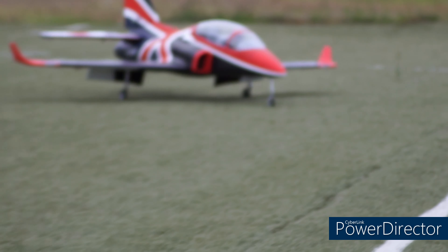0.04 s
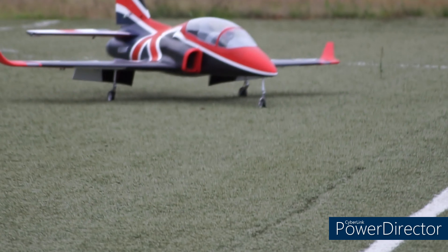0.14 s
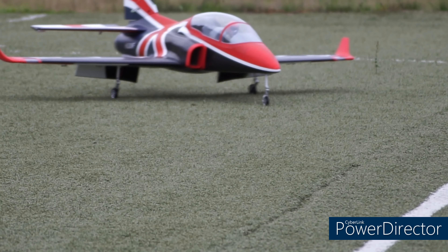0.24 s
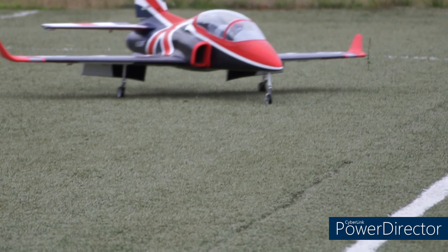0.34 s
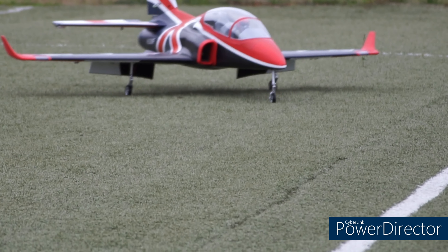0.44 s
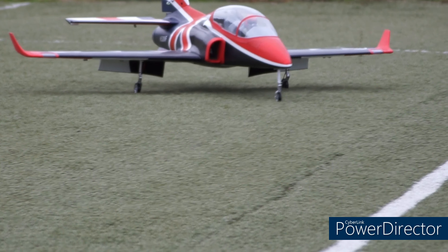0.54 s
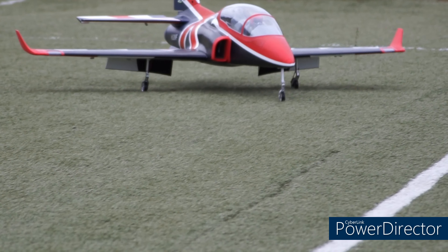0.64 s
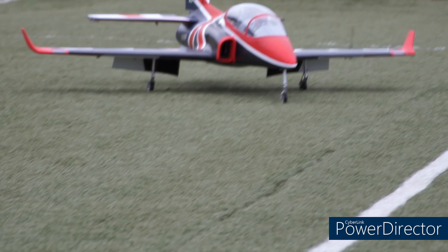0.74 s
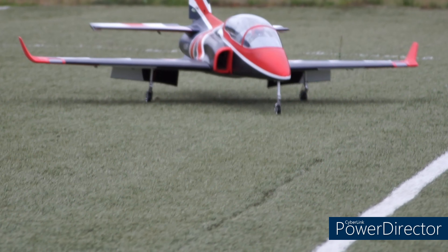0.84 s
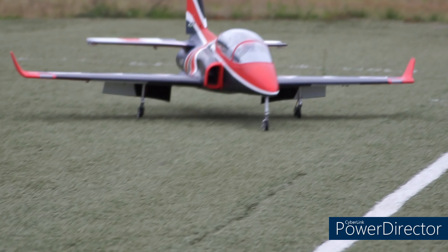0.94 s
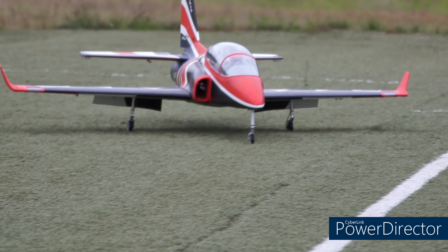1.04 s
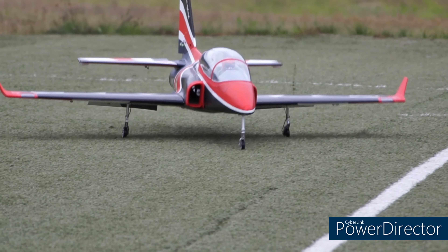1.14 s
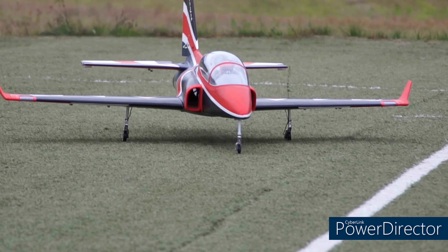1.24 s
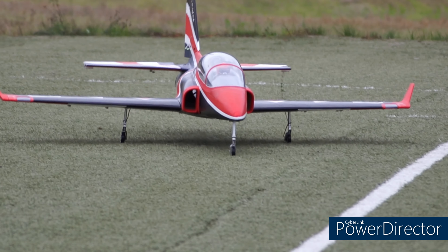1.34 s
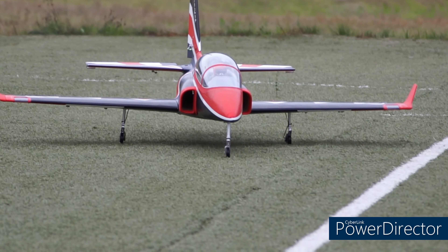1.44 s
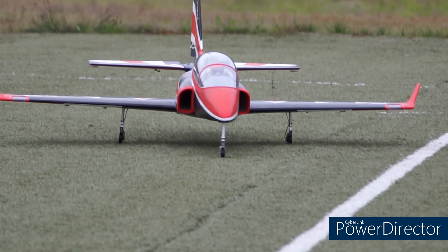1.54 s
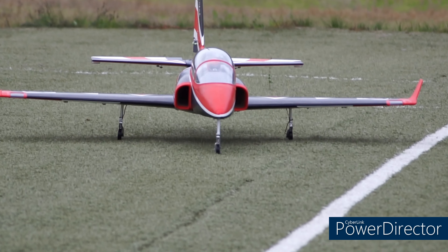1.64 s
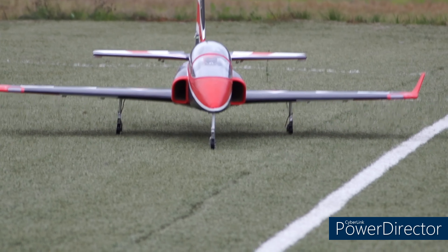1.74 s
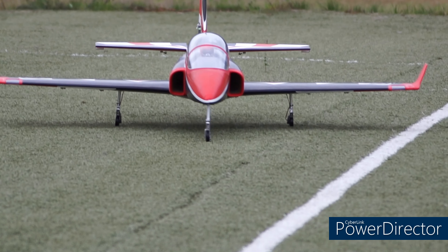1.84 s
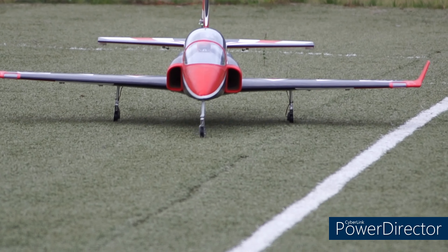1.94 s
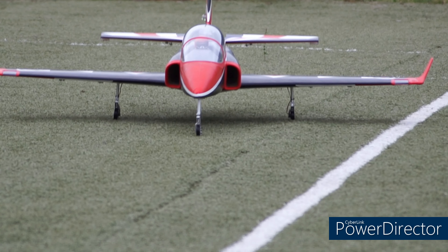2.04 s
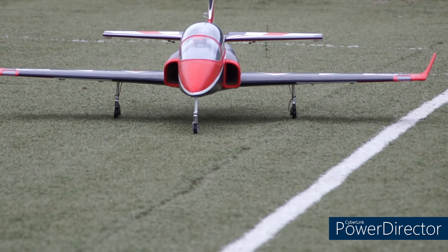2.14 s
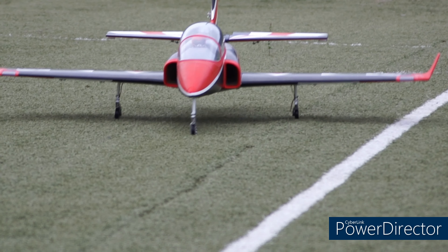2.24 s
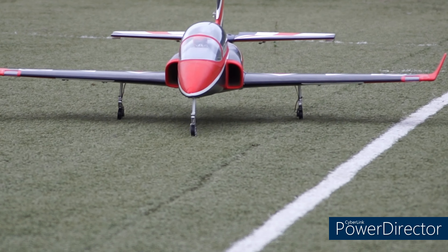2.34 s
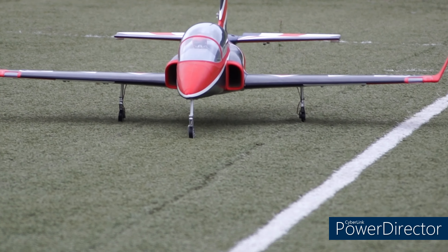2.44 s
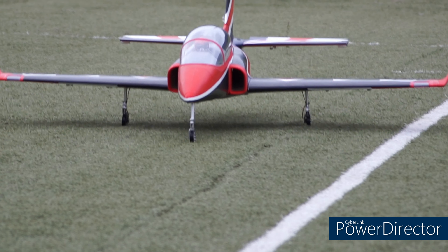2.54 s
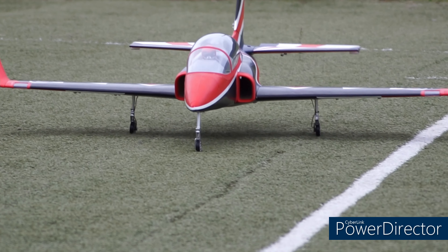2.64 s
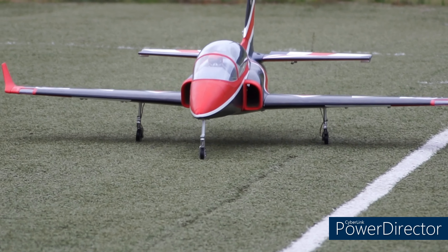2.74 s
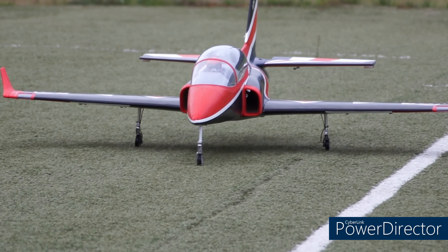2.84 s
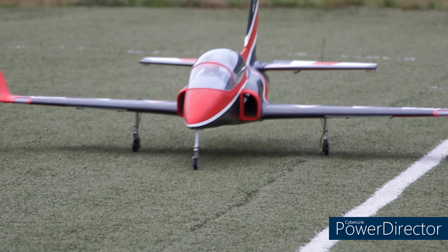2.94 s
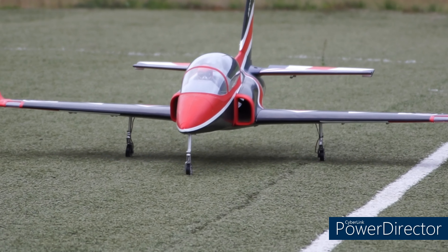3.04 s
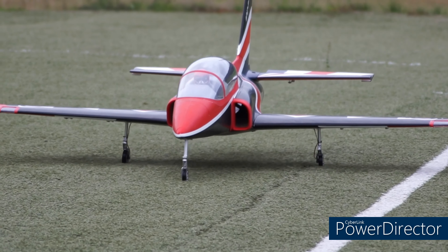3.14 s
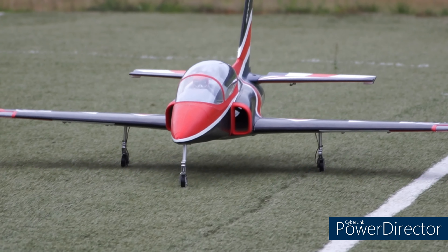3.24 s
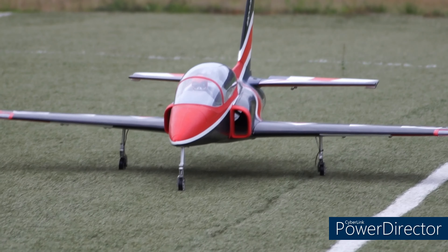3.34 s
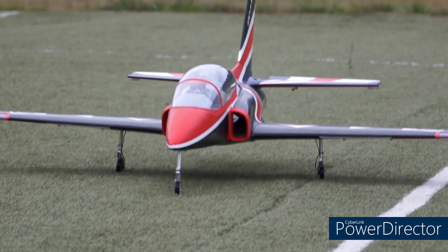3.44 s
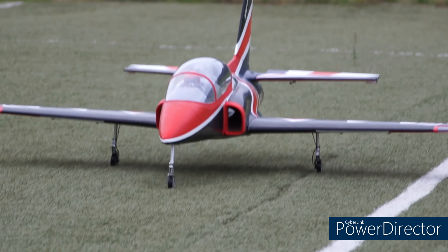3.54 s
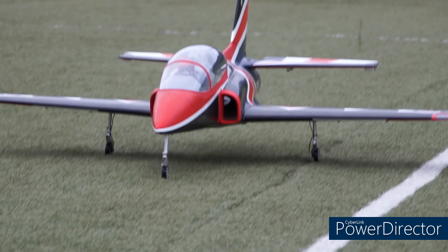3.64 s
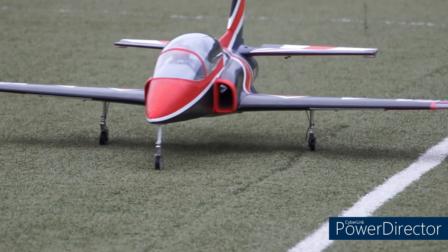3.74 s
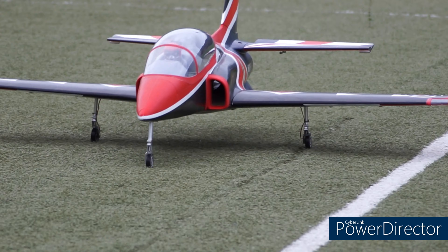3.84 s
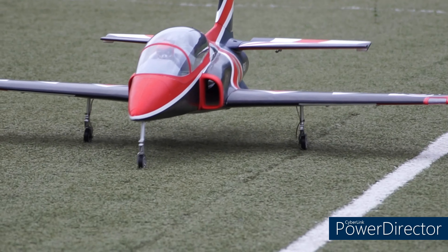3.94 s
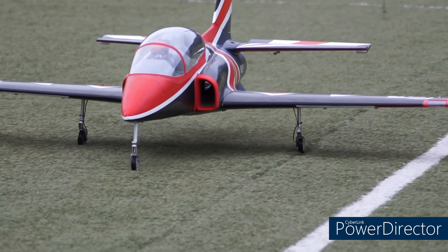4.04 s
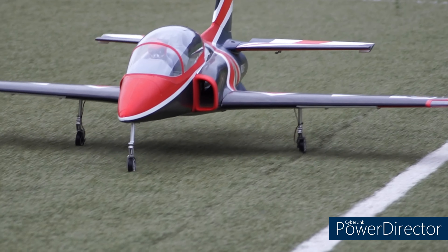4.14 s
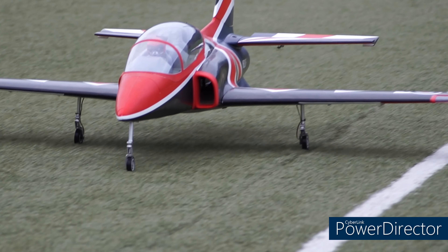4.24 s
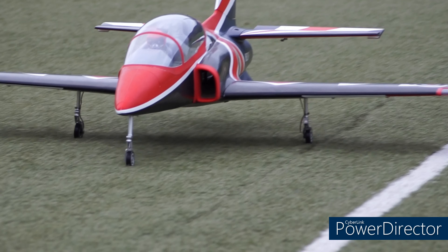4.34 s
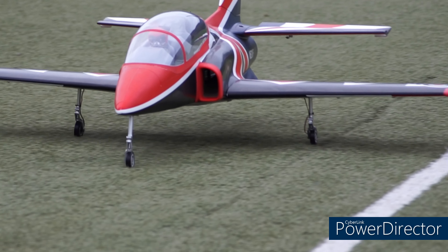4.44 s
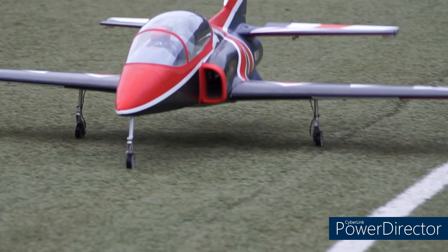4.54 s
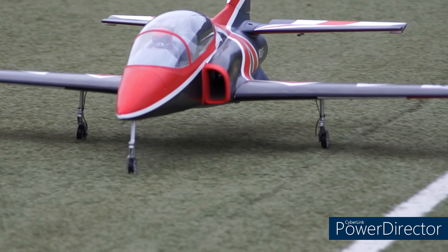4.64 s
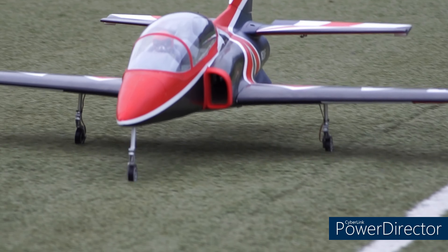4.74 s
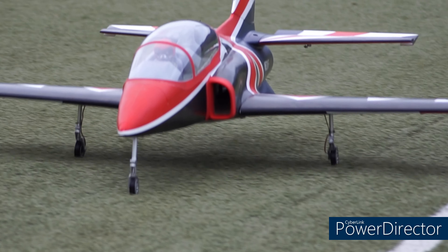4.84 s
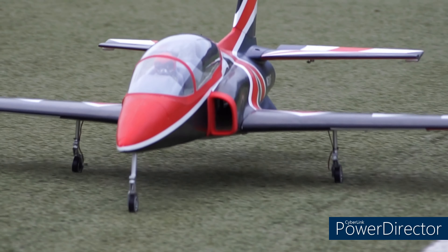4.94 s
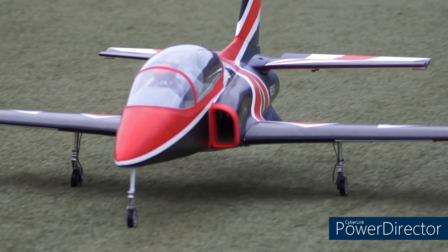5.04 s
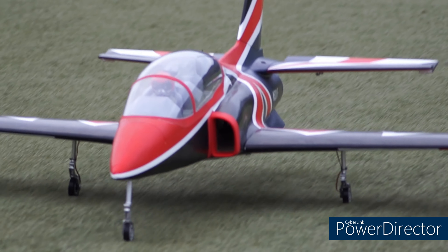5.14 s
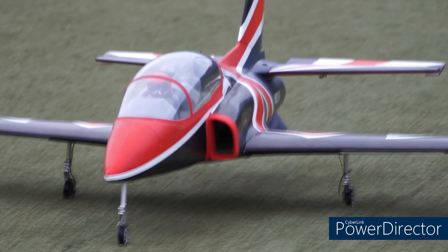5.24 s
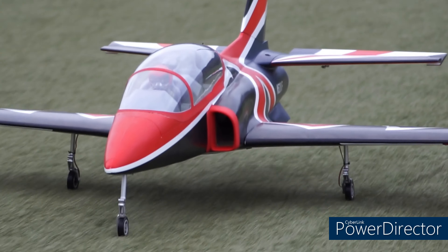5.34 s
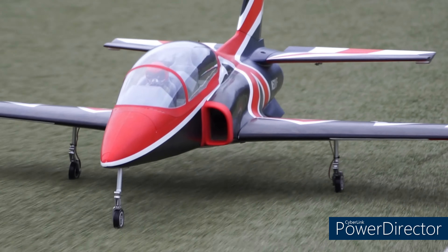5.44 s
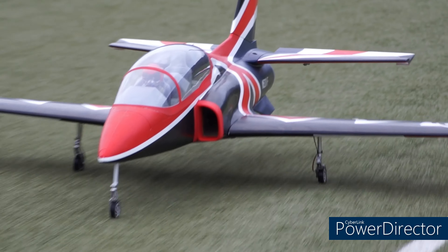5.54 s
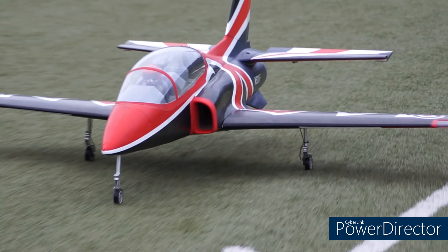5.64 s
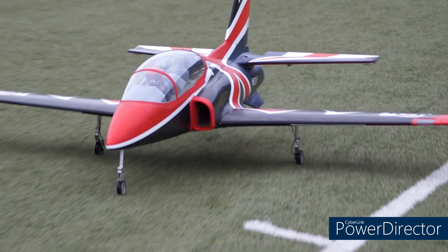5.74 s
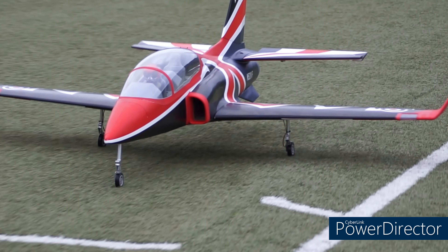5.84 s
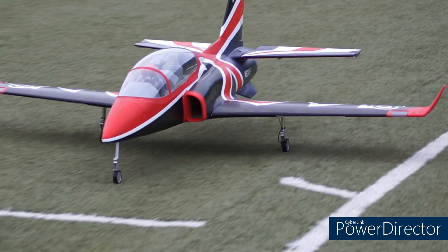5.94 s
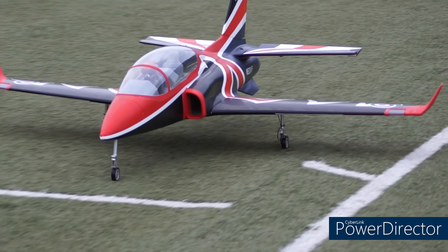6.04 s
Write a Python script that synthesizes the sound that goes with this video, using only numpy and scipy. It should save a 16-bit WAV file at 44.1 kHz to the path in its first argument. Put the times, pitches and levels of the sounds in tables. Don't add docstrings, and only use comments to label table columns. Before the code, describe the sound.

A small ducted-fan jet whines steadily over a rush of air while sharp plastic clicks snap in bursts right beside the microphone.

```python
import sys
import numpy as np
from scipy import signal
from scipy.fft import rfft, irfft, next_fast_len
from scipy.io import wavfile
from scipy.ndimage import uniform_filter1d

SR = 44100
rng = np.random.default_rng(int(sys.argv[2]) if len(sys.argv) > 2 else 0)


def file_out(sig):
    cols = np.atleast_2d(sig).T
    lim = np.clip(cols, -1, 1)
    pcm = np.round(lim * 32767).astype(np.int16)
    wavfile.write(sys.argv[1], SR, pcm)


def voltage_ratio(decibels):
    exponent = np.asarray(decibels, float) / 20
    return 10 ** exponent


N = 268569

# time_s, blade_pass_hz
THROTTLE = [(0, 2410), (.31, 2409), (.72, 2134), (1.4, 2156), (2.19, 2335), (2.485, 2638), (2.67, 2675),
            (2.86, 2674), (3.05, 2631), (3.89, 2628), (4.02, 2710), (4.14, 2726), (4.59, 2697),
            (4.79, 2638), (4.97, 2637), (5.15, 2696), (5.66, 2689), (5.9, 2648)]
INERTIA_S, IDLE_HZ = 0.09, 2400
# time_s, distance_m, side_on_0_to_1
PATH = [
    (0, 12, 0.64),
    (.3, 10.1, 0.2),
    (1.5, 11.9, 0.07),
    (2.3, 10, 0.08),
    (3, 8.5, 0),
    (4.2, 6.25, 0.01),
    (5, 4.93, 0.17),
    (5.4, 4.68, 0.27),
    (5.75, 4.2, 0.51),
    (6.09, 3.9, 0.9),
]
LEVEL_LAWS = {"chopped": (-42, 2, 0.72, -26), "distant": (-42, 1.47, -0.28, -2), "roar": (-54, 9, 1.604, 1),
              "flank": (-63, 0.5, 2, 9), "hiss": (-51, 3.5, 1.41, -1), "upper": (-53, -1, 0.32, 0.5),
              "first": (-55, -1.5, 1.5, 3), "second": (-43.5, 0.2, 0.57, -2.2),
              "whistle": (-64, 2.2, -0.3, -16), "beat": (-52, -0.2, 0.1, 1), "sum": (-62, 4, 0.8, .3)}
LOBES = {"chopped": [(2.9, 0.72, 2)], "upper": [(1.7, 0.59, 5.5), (3.9, .7, -7), (5.8, .6, 6.5)],
         "first": [(.3, 0.24, 2), (.8, 0.3, -4), (1.85, 0.48, 9), (2.33, .14, -7), (3.4, .1, 4.5),
         (3.6, .08, -4), (5.5, 0.58, 5), (6.08, 0.056, 7)], "second": [(.12, 0.34, -12), (.72, 0.055, 4.5),
         (1.01, 0.073, -4), (2.1, 0.17, -19), (3.0, 0.66, 2.5), (3.55, .12, 0), (4.2, 0.087, 3),
         (5.15, 0.13, 3.5)], "whistle": [(.15, .28, 11), (1.3, 0.19, 15.5), (1.98, 0.37, 17),
         (2.95, 0.64, 13), (3.6, .35, 8.5), (5.65, .3, 19)], "beat": [(2.43, .06, 4), (2.75, 0.24, -4.5),
         (6.08, 0.18, -11)], "sum": [(1.75, .2, 11), (4.4, 0.99, 14), (6.0, .1, 12)]}
FLUTTER_DB, SIDE_FLUTTER_DB = 0.6, 6

# blade_order, level_db, half_width_hz
CHOPPED_HUMPS = [(1, -17, 200.0), (2, 0, 550.0), (3, 2, 240.0), (4, -7, 420.0), (5, -11, 500.0)]
# freq_hz, density_db
DISTANT_SPECTRUM = [(18, -75), (100, -34.5), (200, -20.5), (500, -20), (850, -9), (1860, -11), (2300, -7),
                    (2700, -26), (3300, -22), (4500, -9.5), (6000, -2.5), (7800, -10), (11000, -24),
                    (16000, -12.5)]
# freq_hz, density_db
ROAR_SPECTRUM = [(18, -75), (100, -44), (180, -12), (437, -13.5), (916, -8), (1200, -9), (2050, -14.5),
                 (2450, -3.5), (3500, -2), (4500, 3.5), (5800, -8.5), (7000, -17), (9000, -38),
                 (16500, -38)]
# freq_hz, density_db
HISS_SPECTRUM = [(4000, -35), (6500, 5.5), (8000, 0), (9500, 6), (10600, 6), (12300, 0), (13600, 5.5),
                 (15000, -3), (16500, -12)]
# freq_hz, density_db
FLANK_SPECTRUM = [(1200, -29.5), (1900, -9), (2400, 5), (3200, -5.5), (4200, -27)]
# freq_hz, width_hz, level_db
DUCT_MODES = [(433, 58, 8), (673, 92, 7), (908, 75, 6), (1190, 20, 4), (1512, 280, 4.5)]
# freq_hz, width_hz, level_db
INTAKE_MODE = (2620, 145, 11.1)
# freq_hz, side_minus_mid_db
STEREO_WIDTH = [(30, -44), (300, -15.5), (900, -7.5), (2100, -11.5), (3600, -5), (4500, -17.5), (5000, -9),
                (5450, -28), (6200, -9.5), (8000, -9), (9300, -12), (10600, -4), (12200, -5), (14000, -14)]

COMMUTATIONS_PER_BLADE = 2.4
# time_s, switching_hz
SWITCHING = [(.25, 7722), (.6, 7736), (1.5, 7737), (2.55, 7706), (3.3, 7722), (4.75, 7722), (5.12, 7737)]
# freq_hz, width_hz, level_db
FRAME_MODES = [(1182, 61, 17.9), (1271, 68, 6.9), (1423, 54, 2.4), (1554, 110, 5.8)]
FRAME_TOP_HZ, FRAME_CUT_DB_PER_HZ = 1554, 0.4
# time_s, level_db
PANEL_LEVEL = [
    (1.1, -93),
    (1.25, -70),
    (1.6, -77),
    (1.95, -60),
    (2.08, -47.5),
    (2.14, -62),
    (2.3, -80),
]
PANEL_HZ = 1186

# time_s, peak_db, second_group_db, snap_db
CLICKS = [(0.072, -14, -4, -7), (0.7902, -22, -9, -21), (0.798, -16.5, 1, -8.5), (0.8909, -16, -8, -17.5),
          (0.952, -14.5, 0.5, -6.5), (0.9585, -25, 4, -10), (0.9616, -25.5, 3, -4), (1.005, -31, -9, -11),
          (1.1, -33.5, -10, -9), (2.326, -19, -1.5, -6.5), (2.3313, -12, -5.5, -18),
          (2.3467, -26, -15, -25), (2.7785, -36, -6, -3), (2.921, -29.5, -11, -25),
          (3.1037, -15.5, 4, -5.5), (3.11, -22, -16, -8), (3.112, -17, -5, -14), (3.1525, -33, -13, -11),
          (4.8182, -17, -6, -25), (4.8234, -17.5, -2, -25), (4.8279, -8, -4.5, -19),
          (4.8307, -10, -19, -15), (5.2452, -16, -0.5, -20), (5.304, -31, -9, -9), (5.4468, -21, -3, -25),
          (5.5665, -18.5, -11, -25), (5.968, -38, -8, -4)]
# time_s, peak_db
SLIDES = [
    (.121, -23),
    (0.1707, -36),
    (0.7434, -29.5),
    (2.276, -27),
    (4.7745, -25.5),
]
BOUNCE_S, BOUNCE_DB = 0.0065, -13.5
TOUCH_S, TOUCH_LOSS_DB, SLIDE_SECOND_DB, SLIDE_SNAP_DB = 0.0037, 3, -8, -12.5
# freq_hz, level_db, t60_s, group
CASING_MODES = [(940, -13, 0.026, "body"), (1110, -10.5, 0.026, "body"), (1455, 0.5, 0.013, "body"),
                (1613, 1.5, 0.02, "body"), (1857, -1, .016, "body"), (2020, 1, 0.016, "second"),
                (2300, 0.4, .015, "second"), (2730, -8.5, 0.0082, "second"), (3193, 6, .013, "snap"),
                (4030, 3.5, 0.0058, "snap"), (4530, 4.5, 0.0055, "snap"), (5260, 3.5, 0.0061, "snap"),
                (6300, -1, 0.0055, "snap")]
CASING_LEADS = [1.55, 1.94, 1.6, 1.76, 1.94, 1.93, 1.82, 1.4, 1.3, .7, 0.63, 1.3, 1.5]
# time_s, peak_db
THUMPS = [
    (.123, -39),
    (.799, -51),
    (.9, -45),
    (.954, -46),
    (2.3322, -33.5),
    (3.105, -53),
    (4.83, -34),
]
# freq_hz, t60_s
HOUSING_MODES = [(340, 0.016), (480, 0.048), (640, 0.045)]

# time_s, half_length_s, above_calm_db
GUSTS = [(.05, .3, 15), (.88, .07, 18), (1.2, 0.056, 30), (1.36, .05, 22), (1.75, .15, 18.6),
         (3.28, .2, 18), (3.85, .1, 16), (4.21, 0.11, 13), (4.84, 0.065, 14), (5.64, .15, 15),
         (6.08, .1, 12)]
CALM_DB = -90
# freq_hz, width_hz, level_db
PORT_DIP = (7350, 600, -4)
SOFT_CLIP, CUTOFF_HZ = 0.8, 15780


def whine(blades, level):
    flutter_db = level["flutter"]
    first = 1.25 * voltage_ratio(flutter_db * drift(hz=25)) * np.sin(blades + 0.3 * drift(hz=25))
    first = voltage_ratio(level["first"]) * (first + 0.1 * flutter_db * smeared(blades, hz=40))
    second = 0.8 * voltage_ratio(3.5 * drift(hz=30)) * np.sin(2 * blades + 0.9 * drift(hz=30))
    second = second + 0.7 * smeared(2 * blades, hz=65)
    third = voltage_ratio(-27) * smeared(3 * blades, hz=80)
    upper = voltage_ratio(level["second"]) * (second + third)
    left = first * voltage_ratio(-2.5) + upper * voltage_ratio(1.0)
    right = np.roll(first, 1) * voltage_ratio(2.5) + upper * voltage_ratio(-2.0)
    return np.array([left, right])


def air(blades, level):
    humps = [voltage_ratio(db) * smeared(order * blades, hz) for order, db, hz in CHOPPED_HUMPS]
    layers = {
        "chopped": sum(humps[:2]),
        "distant": rush(DISTANT_SPECTRUM, DUCT_MODES, patchy_db=0.7),
        "roar": rush(ROAR_SPECTRUM, DUCT_MODES + [INTAKE_MODE], patchy_db=0.2),
        "hiss": rush(HISS_SPECTRUM, [], patchy_db=0.5),
        "upper": sum(humps[2:]),
        "flank": rush(FLANK_SPECTRUM, [], patchy_db=0.2)}
    diffuse_db = {"chopped": -5, "distant": 2.5, "roar": -4, "hiss": -4, "upper": -4, "flank": -6}
    mid, unrelated = np.zeros(N), np.zeros(N)
    for name, layer in layers.items():
        gain = voltage_ratio(level[name])
        mid += gain * layer
        unrelated += voltage_ratio(diffuse_db[name]) * gain * np.roll(layer, SR // 10)
    return spread(mid, unrelated, shadow=0.043)


def rush(spectrum, resonances, patchy_db):
    noise = coloured(rng.standard_normal(N), lambda hz: at_hz(spectrum, hz) + bumps_db(resonances, hz))
    return rms_one(noise) * voltage_ratio(patchy_db * drift(hz=4.5))


def spread(mid, unrelated, shadow):
    side = coloured(shadow * np.roll(mid, 2) + unrelated, lambda hz: at_hz(STEREO_WIDTH, hz))
    return np.array([mid + side, mid - side])


def motor(blade_hz, switch_hz, level):
    beat_hz = switch_hz - COMMUTATIONS_PER_BLADE * blade_hz
    above_frame_hz = np.maximum(beat_hz - FRAME_TOP_HZ, 0)
    beat_db = level["beat"] + bumps_db(FRAME_MODES, beat_hz) - FRAME_CUT_DB_PER_HZ * above_frame_hz
    whistle = voltage_ratio(level["whistle"] + 2.0 * drift(hz=1.6)) * np.sin(turning(switch_hz + 3 * drift(hz=15)))
    beat = voltage_ratio(beat_db - 1.0 + 1.4 * drift(hz=23)) * np.sin(turning(beat_hz + 5.1 * drift(hz=18.1)))
    sum_tone = 0.24 * voltage_ratio(level["sum"]) * smeared(turning(switch_hz + blade_hz), hz=25)
    panel = voltage_ratio(in_time(PANEL_LEVEL)[0]) * np.sin(turning(PANEL_HZ + 3 * drift(hz=19)))
    stereo = whistle * voltage_ratio([[-3], [2.5]]) + (beat + panel) * voltage_ratio([[0.6], [-0.6]])
    return np.sqrt(2) * (stereo + sum_tone)


def clicks(soft_hz, rattle_db, rattle_t60_s):
    time_s, peak_db, second_db, snap_db = touches()
    group_db = {"body": 0, "second": second_db, "snap": snap_db}
    at, out = np.round(time_s * SR).astype(int), np.zeros((2, N))
    scatter_db = rng.normal(0, 1, (len(at), len(CASING_MODES)))
    grains = rng.standard_normal((2, N)) * (rng.random((2, N)) < 0.15)
    for k, (hz, level_db, t60_s, group) in enumerate(CASING_MODES):
        blows = np.full(N, 1e-18)
        blows[at] = voltage_ratio(peak_db + group_db[group] + level_db + scatter_db[:, k])
        blows *= (-1) ** max(k, 2)
        rattle_tail = signal.lfilter([1], [1, -decay(rattle_t60_s)], blows)
        rattle = grains * voltage_ratio(rattle_db) * rattle_tail
        r, w = decay(t60_s), 2 * np.pi * hz / SR
        swell = np.exp(-2 * np.pi * soft_hz * hz / 1500 / SR)
        ring_poles = [1, -2 * r * np.cos(w), r * r]
        build_poles = [1, -2 * swell * np.cos(w), swell ** 2]
        for side, phase in enumerate((CASING_LEADS[k] / 2, -CASING_LEADS[k] / 2)):
            ring = signal.lfilter([np.sin(phase), np.sin(w - phase)], ring_poles, blows + rattle[side])
            build = signal.lfilter([np.sin(phase), swell * np.sin(w - phase)], build_poles, blows)
            out[side] += ring - build
    return bandpass(out, 3, 600, 7500)


def touches():
    bounces = [(s + BOUNCE_S * rng.uniform(0.6, 1.4), db + BOUNCE_DB, second_db, snap_db)
               for s, db, second_db, snap_db in CLICKS]
    runs = []
    for s, db in SLIDES:
        for k in range(5):
            touch_s = s + TOUCH_S * k * rng.uniform(0.9, 0.98)
            touch_db = db - TOUCH_LOSS_DB * k + rng.normal(0, 2.3)
            runs.append((touch_s, touch_db, SLIDE_SECOND_DB, SLIDE_SNAP_DB))
    return np.transpose(CLICKS + bounces + runs)


def thumps():
    blows, out = np.full(N, 1e-18), np.zeros(N)
    for s, db in THUMPS:
        blows[round(s * SR)] = voltage_ratio(db)
    for hz, t60_s in HOUSING_MODES:
        r, w = decay(t60_s), 2 * np.pi * hz / SR
        out += signal.lfilter([0, np.sin(w)], [1, -2 * r * np.cos(w), r * r], blows)
    soft = bandpass(out, 2, 300, 900)
    return np.array([soft * voltage_ratio(-4.5), np.roll(soft, 4)])


def breeze():
    shared, own = bandpass(rng.standard_normal((2, N)), 3, 50, 120)
    gusts = voltage_ratio(CALM_DB + swells(GUSTS) + 3.4 * drift(hz=6.5))
    return gusts * rms_one(np.array([shared + 0.62 * own, shared - 0.53 * own]))


def levels(blade_hz):
    distance_m, side_on = in_time(PATH)
    speed_db, near_db = 20 * np.log10(blade_hz / IDLE_HZ), 20 * np.log10(10 / distance_m)
    level = {}
    for name, (idle_db, per_speed, per_near, side_db) in LEVEL_LAWS.items():
        law_db = idle_db + per_speed * speed_db + per_near * near_db + side_db * side_on
        level[name] = law_db + swells(LOBES.get(name, []))
    level["flutter"] = FLUTTER_DB + SIDE_FLUTTER_DB * np.sqrt(np.clip(side_on, 0, 1))
    return level


def swells(rows):
    return sum(db * np.exp(-((np.arange(N) / SR - s) / length_s) ** 2) for s, length_s, db in rows)


def in_time(rows):
    s, *columns = np.transpose(rows)
    return [np.interp(np.arange(N) / SR, s, column) for column in columns]


def turning(hz):
    return 2 * np.pi * (np.cumsum(hz) / SR + rng.random())


def drift(hz):
    r = np.exp(-2 * np.pi * hz / SR)
    return rms_one(signal.lfilter([1], [1, -2 * r, r * r], rng.standard_normal(N + 4000))[-N:])


def smeared(phase, hz):
    return drift(hz) * np.cos(phase) + drift(hz) * np.sin(phase)


def decay(t60_s):
    return voltage_ratio(-60 / (t60_s * SR))


def rms_one(x):
    return x / np.sqrt(np.mean(x ** 2) + 1e-20)


def bandpass(x, order, low_hz, high_hz):
    return signal.sosfilt(signal.butter(order, [low_hz, high_hz], "band", fs=SR, output="sos"), x)


def at_hz(points, hz):
    point_hz, db = np.transpose(points)
    return np.interp(np.log(hz + 1), np.log(point_hz), db)


def bumps_db(resonances, hz):
    return sum(db / (1 + (2 * (hz - centre_hz) / width_hz) ** 2) for centre_hz, width_hz, db in resonances)


def coloured(x, db_of_hz):
    size = next_fast_len(N)
    gain = voltage_ratio(db_of_hz(np.fft.rfftfreq(size, 1 / SR)))
    return irfft(rfft(x, size) * gain, size)[..., :N]


def scene():
    blade_hz = uniform_filter1d(in_time(THROTTLE)[0], int(INERTIA_S * SR), mode="nearest")
    switch_hz = in_time(SWITCHING)[0]
    blades, level = turning(blade_hz), levels(blade_hz)
    jet = whine(blades, level) + air(blades, level) + motor(blade_hz, switch_hz, level)
    mechanism = clicks(soft_hz=367, rattle_db=-28.5, rattle_t60_s=0.056) + thumps()
    return jet + mechanism + breeze()


def band_limit(x):
    return signal.sosfilt(signal.butter(12, 16410, fs=SR, output="sos"), x)


def record(dry):
    def response_db(hz):
        bass_loss_db = 12 / (1 + (hz / 55) ** 4)
        return bumps_db([PORT_DIP], hz) - 80 * (hz > CUTOFF_HZ) - bass_loss_db

    mix = coloured(SOFT_CLIP * np.tanh(dry / SOFT_CLIP), response_db)
    return band_limit(mix)


dry = scene()
out = record(dry)
file_out(out)
```